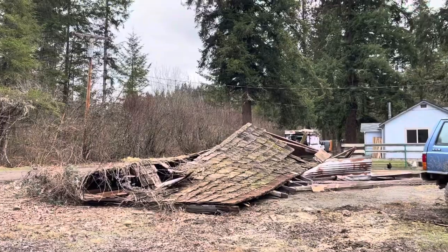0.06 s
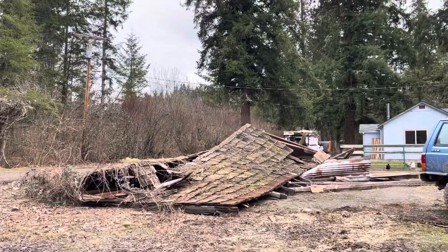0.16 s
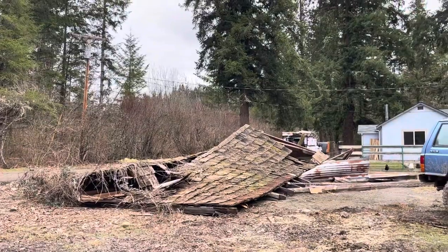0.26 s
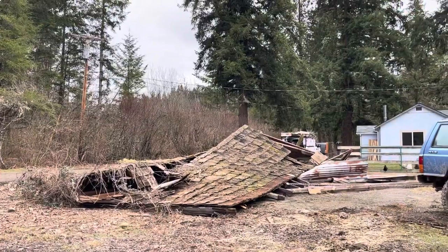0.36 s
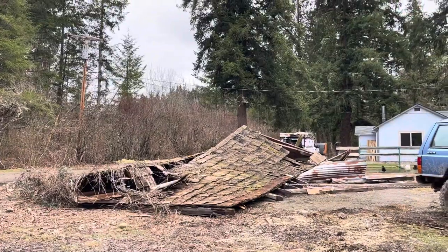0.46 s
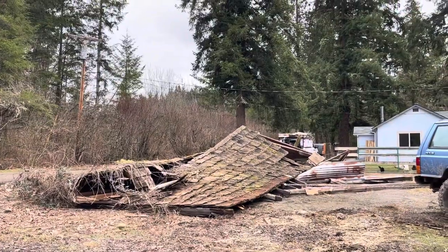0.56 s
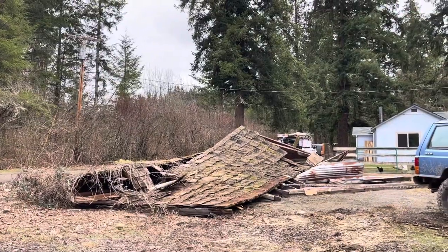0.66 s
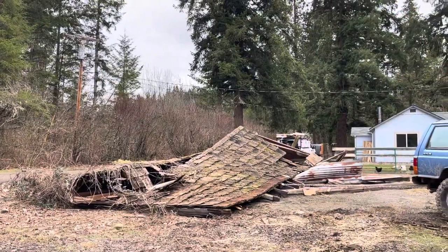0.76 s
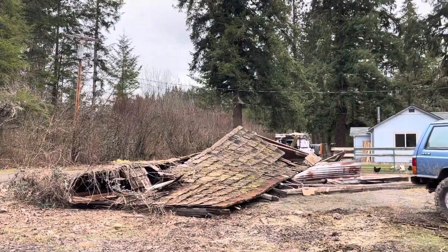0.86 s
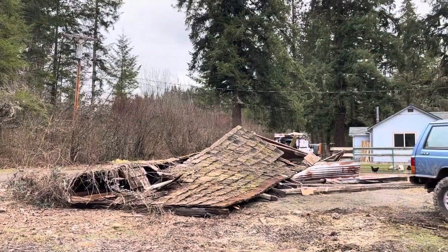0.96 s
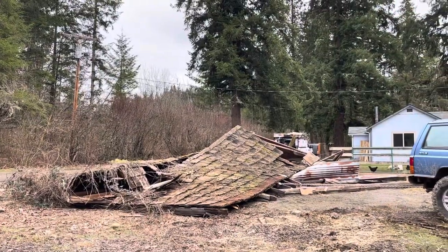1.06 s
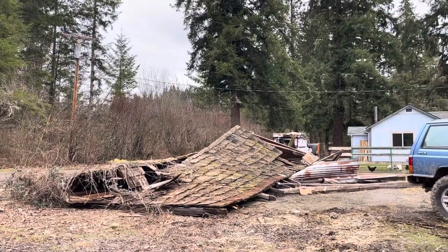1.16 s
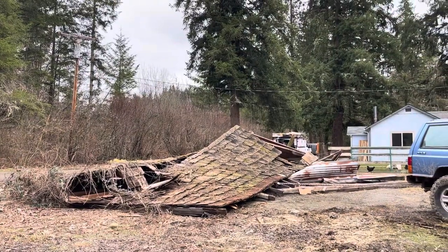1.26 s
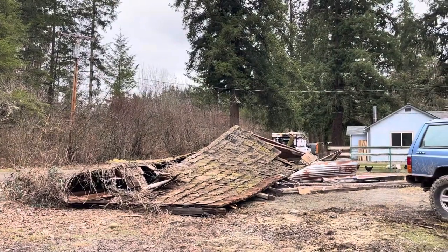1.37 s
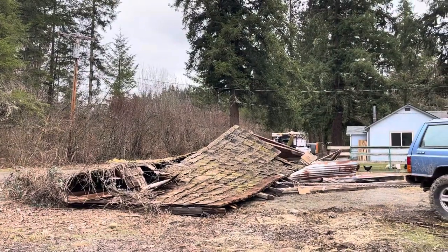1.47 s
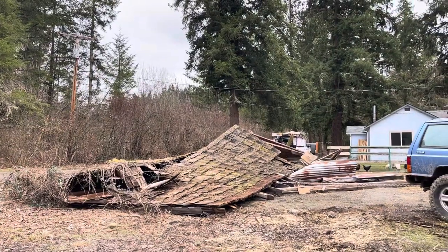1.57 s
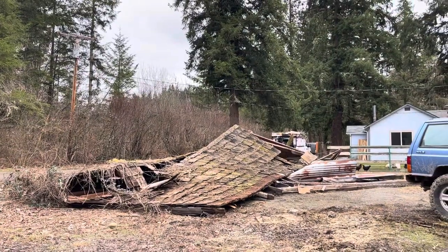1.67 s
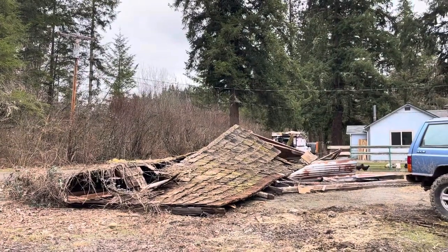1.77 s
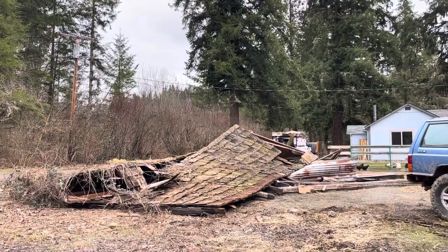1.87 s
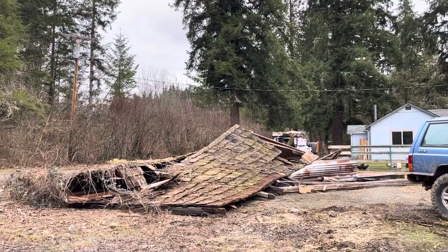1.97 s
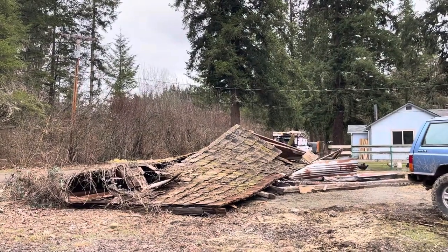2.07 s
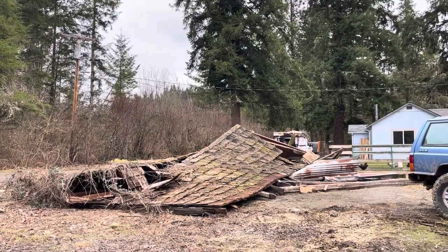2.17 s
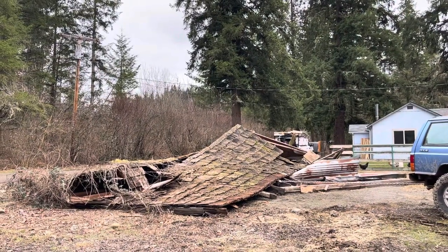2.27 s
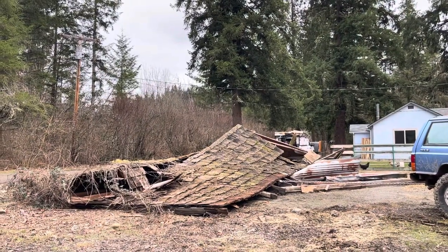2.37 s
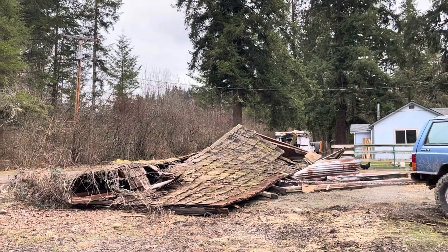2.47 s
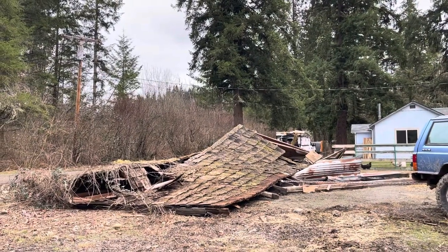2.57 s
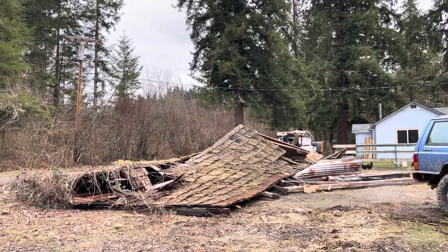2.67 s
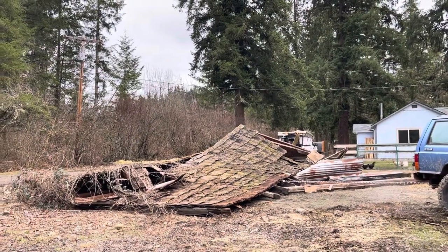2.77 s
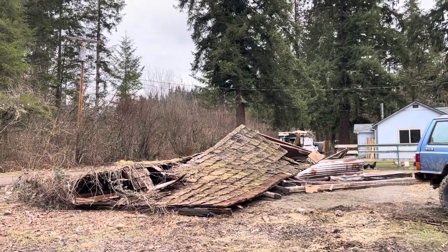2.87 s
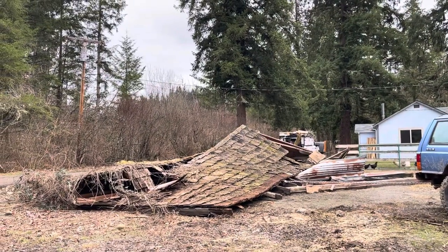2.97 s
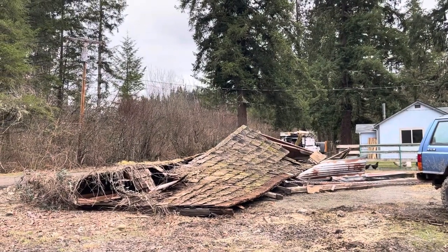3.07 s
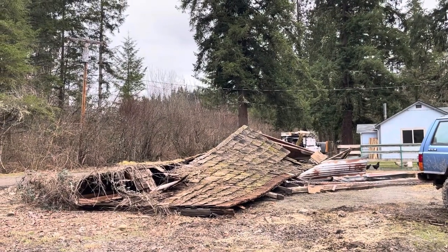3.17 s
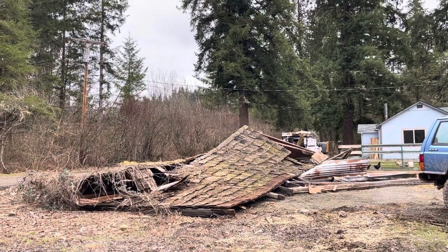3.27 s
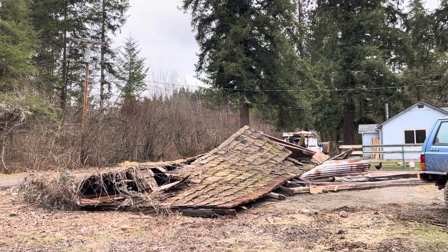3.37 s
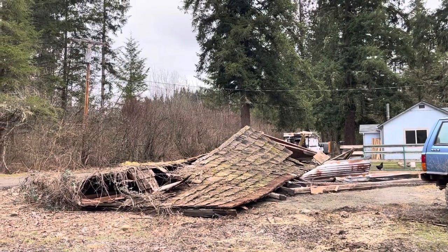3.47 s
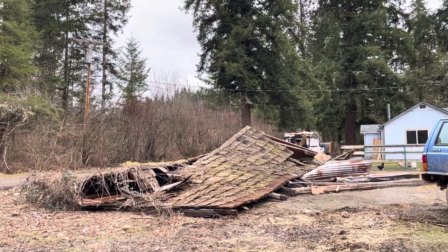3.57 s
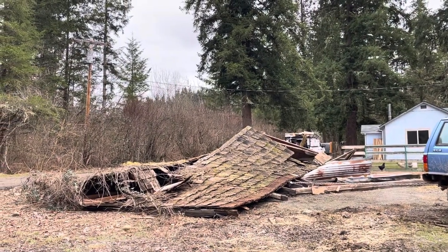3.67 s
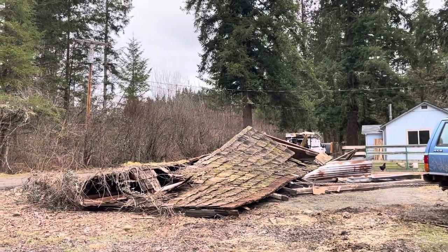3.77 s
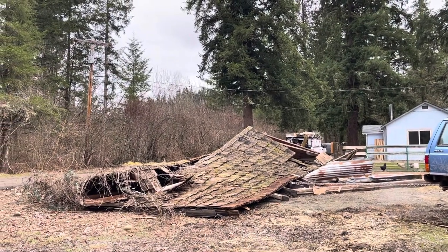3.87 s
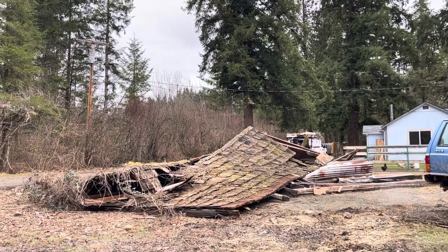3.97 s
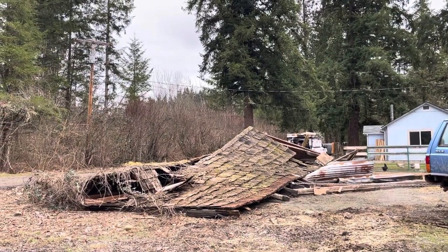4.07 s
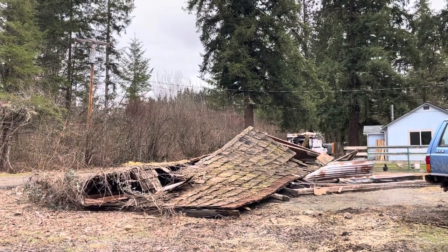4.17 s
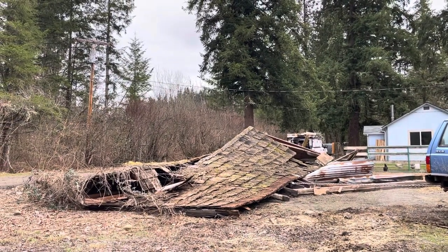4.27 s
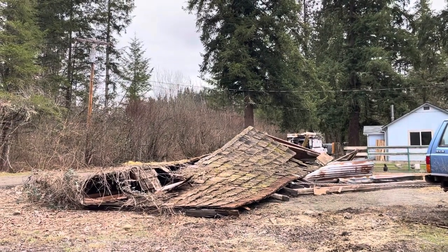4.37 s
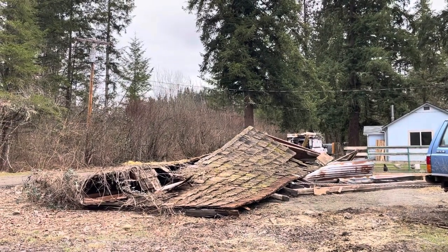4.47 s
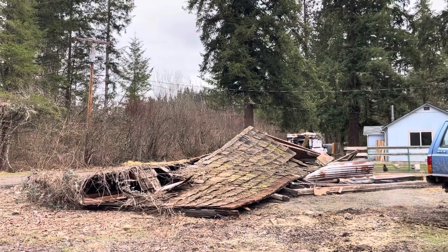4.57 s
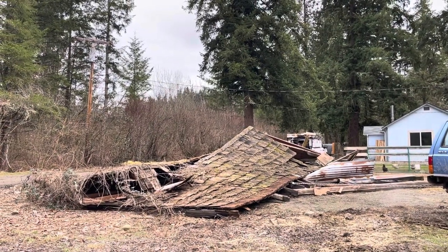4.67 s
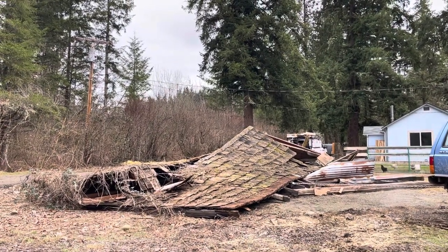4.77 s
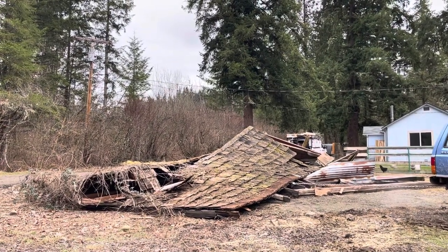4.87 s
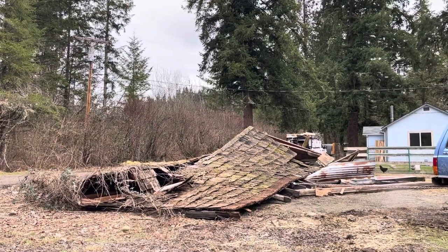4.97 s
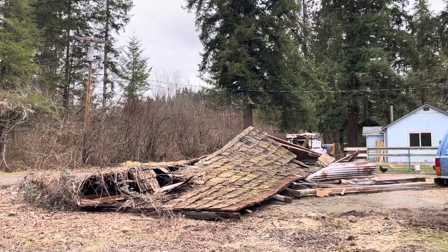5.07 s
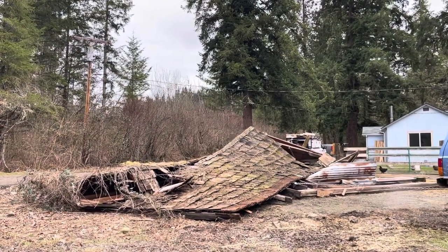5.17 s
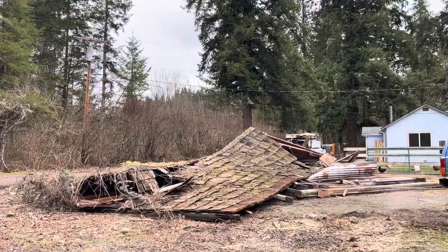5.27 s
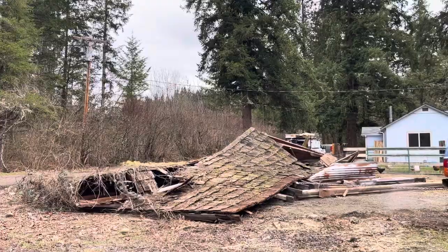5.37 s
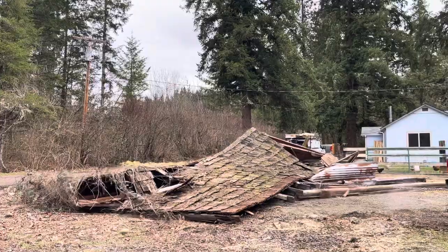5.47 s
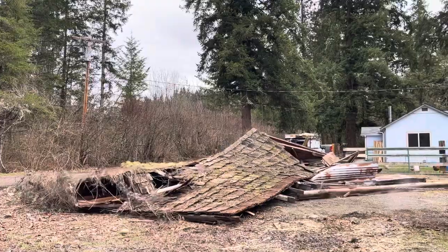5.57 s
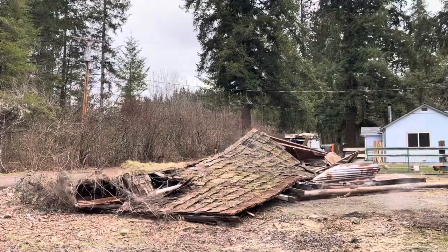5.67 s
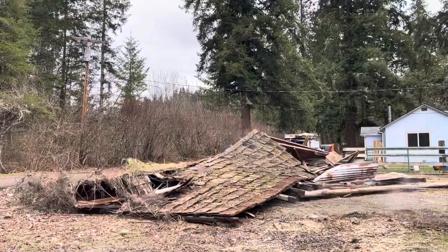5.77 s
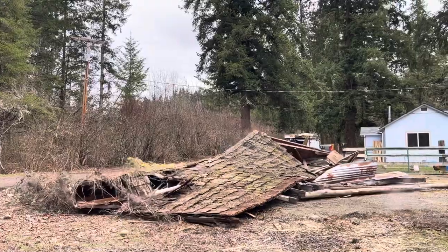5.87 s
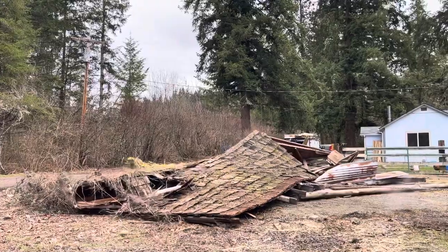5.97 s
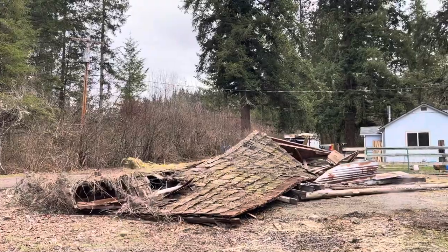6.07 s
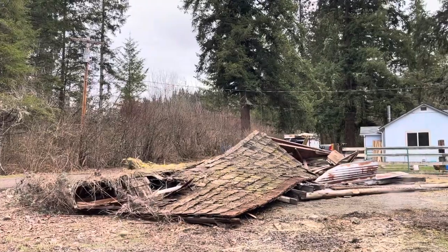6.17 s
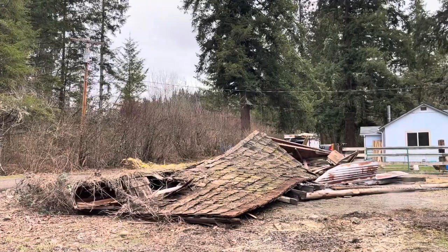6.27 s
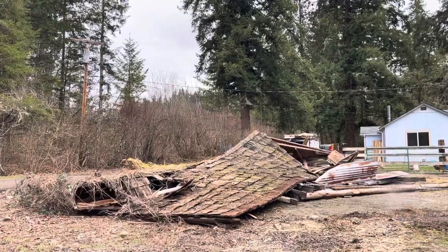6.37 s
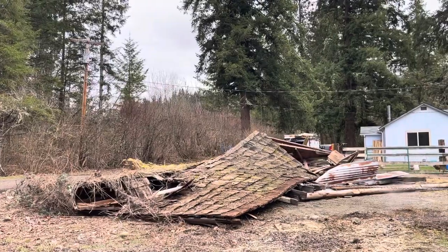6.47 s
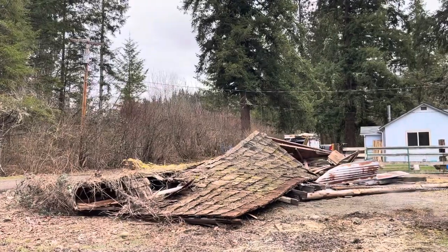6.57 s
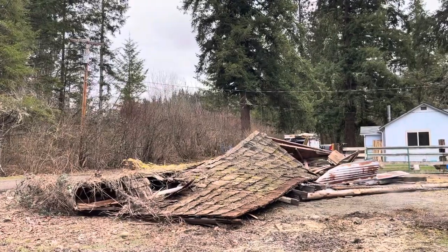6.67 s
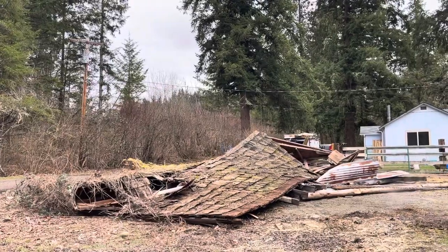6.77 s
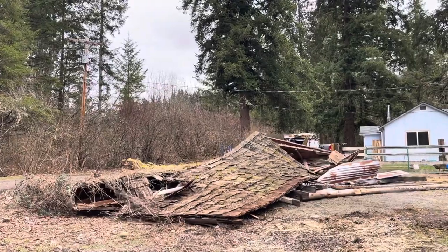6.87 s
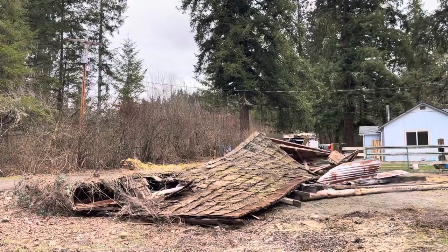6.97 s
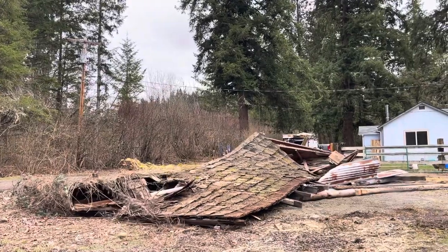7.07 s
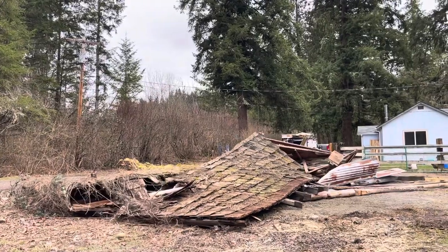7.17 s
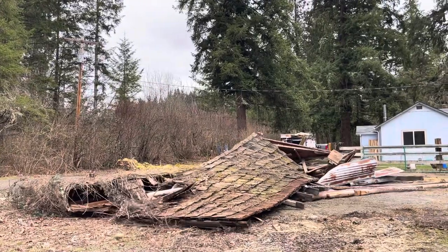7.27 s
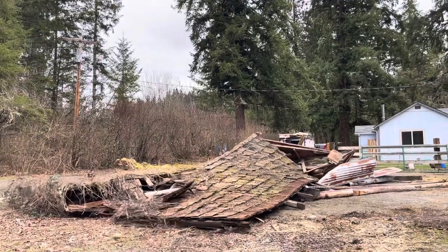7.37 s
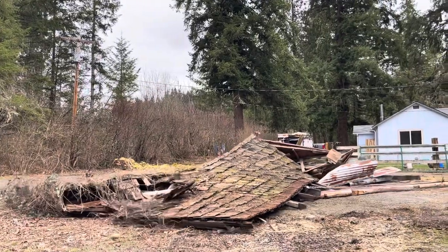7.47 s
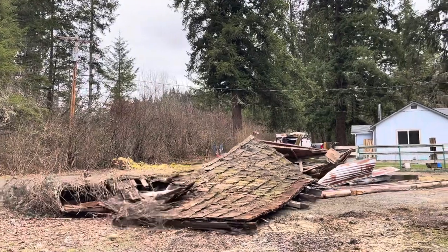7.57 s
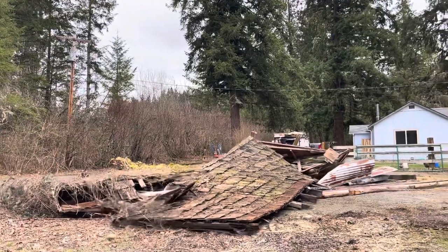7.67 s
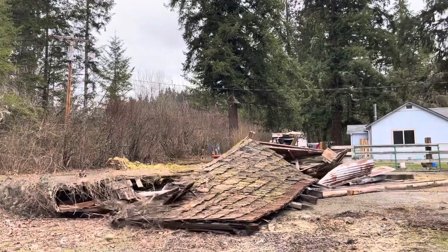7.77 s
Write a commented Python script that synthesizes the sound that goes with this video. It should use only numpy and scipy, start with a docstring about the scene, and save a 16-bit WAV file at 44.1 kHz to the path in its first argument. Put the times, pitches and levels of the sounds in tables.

```python
"""An open farm lot: a truck to the right of two microphones hauls on a line tied to a fallen barn.
Its eight-cylinder engine labours, revs, drops towards idle and pulls again: orders of the firing rate
through an exhaust pipe, with rumble, hiss and valve clatter. Boards snap, rip and knock as bursts of fibre
fractures and hollow ringing modes; nails squeak, a beam groans, timbers thump the ground, and the shingled
roof slides and settles, loudest towards 5.6 s and 7.7 s. A tree line returns a dull echo of the wreck."""
import sys
import numpy as np
from scipy import signal
from scipy.fft import rfft, irfft
from scipy.io import wavfile
from scipy.ndimage import uniform_filter1d

SR = 44100
rng = np.random.default_rng(int(sys.argv[2]) if len(sys.argv) > 2 else 0)


def materialize(psi):
    """Save the field psi as 16-bit PCM at rate SR to the path in sys.argv[1].

    A 1-D psi becomes a single channel; in a 2-D psi each row is a channel.
    """
    bounded = np.clip(np.atleast_2d(psi).T, -1, 1)
    quanta = np.round(bounded * 32767).astype(np.int16)
    wavfile.write(sys.argv[1], SR, quanta)


N = 344421
TIME = np.arange(N) / SR


def from_db(db):
    """Decibels to gain."""
    return 10 ** (np.asarray(db) / 20)


def rms_one(x):
    """Scale to unit power."""
    return x / np.sqrt(np.mean(x ** 2) + 1e-20)


def in_time(rows):
    """Each column of a curve at every sample."""
    s, *columns = np.transpose(rows)
    return [np.interp(TIME, s, column) for column in columns]


def at_hz(points, hz):
    """Read a spectrum on a log-frequency axis."""
    f, value = np.transpose(points)
    return np.interp(np.log(hz + 1e-3), np.log(f), value)


def drift(rate):
    """Smooth random course of unit power with `rate` new values a second."""
    knots = rng.standard_normal(N // 20)
    return rms_one(np.interp(TIME * rate, np.arange(len(knots)), knots))


def body(spectrum, modes_db=0, spacing_hz=150, size=2048):
    """Causal impulse response of unit energy; random peaks and dips are one body's own resonances."""
    hz = np.arange(size // 2 + 1) * SR / size
    peaks = np.interp(hz / spacing_hz, np.arange(size), rng.standard_normal(size))
    # folding the cepstrum onto positive time gives minimum phase
    cepstrum = irfft(np.log(from_db(at_hz(spectrum, hz) + modes_db * peaks)))
    cepstrum[1:size // 2] *= 2
    cepstrum[size // 2 + 1:] = 0
    response = irfft(np.exp(rfft(cepstrum)))
    return response / np.linalg.norm(response)


def through(x, response):
    """Filter, keeping the length."""
    return signal.oaconvolve(x, response)[:len(x)]


def add(out, s, sound):
    """Mix a sound in from time s."""
    at = int(s * SR)
    out[at:at + len(sound)] += sound[:N - at]


# engine speed before the flywheel smooths it: (time [s], firing rate [firings per s])
ENGINE_SPEED = [(0.0, 60.0), (0.35, 60.6), (0.76, 88.9), (1.22, 89.7), (1.56, 105.8), (2.01, 102.6),
                (4.18, 104.6), (4.82, 110.6), (4.99, 124.0), (5.22, 130.0), (5.39, 125.0), (5.8, 69.7),
                (6.31, 67.2), (6.78, 110.0), (6.92, 115.3), (7.28, 107.8), (7.48, 96.4), (7.81, 91.9)]
# hauls on the taut line: (time [s], length [s])
LINE_HAULS = [(4.574, 0.43), (6.72, 0.51)]
FLYWHEEL_S, TAKE_UP_S = .1, 0.19
CRUISE_HZ = 104  # firings per second
CRUISE_DB, DB_PER_OCTAVE, DB_PER_OCTAVE_PER_S, STRAIN_DB = -22.5, 4.5, 0.4, 3


def running():
    """Flywheel-smoothed firing rate; exhaust level in dB grows with speed, acceleration and a taut line."""
    rate = uniform_filter1d(in_time(ENGINE_SPEED)[0], int(FLYWHEEL_S * SR), mode="nearest")
    octaves = np.log2(rate / CRUISE_HZ)
    octaves_per_s = np.gradient(octaves) * SR
    taut = 0
    for s, length in LINE_HAULS:
        corners = [s, s + TAKE_UP_S, s + length, s + length + TAKE_UP_S]
        taut = taut + np.interp(TIME, corners, [0, 1, 1, 0])
    load_db = CRUISE_DB + DB_PER_OCTAVE * octaves + DB_PER_OCTAVE_PER_S * octaves_per_s + STRAIN_DB * taut
    return rate, load_db


# uneven firing of the two banks: (multiple of the firing rate [ratio], level before pipe and load [dB])
FIRING_ORDERS = [(0.499, 5), (1, -0.27), (1.25, -15.5), (1.5, -5.5), (1.75, -11.5), (2, -9), (3, -4),
                 (3.998, -7.5), (6, -8.5)]
# response of the exhaust pipe: (frequency [Hz], gain [dB])
EXHAUST_PIPE = [(28, -47), (44, -15), (78, -7.5), (90, -2.7), (104, -1.95), (130, -10.5), (155, -9),
                (182, -12.5), (205, -10), (235, -20.5), (305, -23), (430, -40.5), (640, -21.6)]
EDGE_DB_PER_OCTAVE = 11  # softer pulses below cruise speed: orders from the third up weaken


def engine_tone(rough=0.048, lope=0.24):
    """Orders of the firing rate, sounded through the exhaust pipe."""
    rate, load_db = running()
    phase = 2 * np.pi * np.cumsum(rate) / SR
    octaves_below_cruise = np.minimum(np.log2(rate / CRUISE_HZ), 0)
    tone = 0
    for multiple, db in FIRING_ORDERS:
        # the bank and firing beats are firm; the other orders waver more
        unsteady = rough if multiple < 1.1 and db > -6 else lope
        angle = multiple * phase + rng.uniform(0, 2 * np.pi)
        wave = (1 + unsteady * drift(24)) * np.sin(angle) + unsteady * drift(24) * np.cos(angle)
        edge_db = EDGE_DB_PER_OCTAVE * octaves_below_cruise * (round(multiple) > 2)
        pipe_db = at_hz(EXHAUST_PIPE, multiple * rate)
        tone = tone + np.sqrt(2) * wave * from_db(db + edge_db + pipe_db)
    return from_db(load_db) * tone


# fan and valve gear: (frequency [Hz], relative density [dB per Hz])
FAN_AND_VALVES = [(150, -14.5), (300, 9), (430, 2.5), (700, 5), (920, -0.4), (1400, -4), (2200, -8.5),
                  (2800, -7.5), (3700, -14), (4600, -17), (6000, -15.5), (9000, -14.5), (11400, -19),
                  (12400, -81)]


def engine_noise(rumble_db=-14.5, hiss_db=-40.5, hiss_slope_db=8.0, chuff=0.091, clatter=0.072, size=128):
    """Combustion rumble and hiss flutter once a revolution; valve clatter repeats every eight firings."""
    rate, load_db = running()
    cycles = np.cumsum(rate) / SR / 8
    puffs = 1 + chuff * np.cos(2 * np.pi * 2 * cycles)  # two revolutions a cycle
    valves = clatter * np.interp(cycles % 1, np.linspace(0, 1, size), rng.standard_normal(size))
    band = signal.butter(2, [116, 415], "band", fs=SR, output="sos")
    combustion = through(rng.standard_normal(N) * puffs, body(EXHAUST_PIPE, size=8192))
    rumble = rms_one(signal.sosfilt(band, combustion))
    hiss = rms_one(through((rng.standard_normal(N) + valves) * puffs, body(FAN_AND_VALVES)))
    octaves = np.log2(rate / np.median(rate))
    # hiss follows only half of the change in load
    hiss_level_db = hiss_db + hiss_slope_db * octaves + .5 * (load_db - np.median(load_db))
    return from_db(load_db + rumble_db) * rumble + from_db(hiss_level_db) * hiss


# colour the microphones give the truck's side: (frequency [Hz], left minus right [dB])
TRUCK_SIDE_COLOUR = [(350, 0), (660, -7.5), (1900, 6.5), (2800, -2), (3700, -3.3), (5000, 7.2), (5900, 3.5),
                     (7500, 0.6)]
TRUCK_LAG_S = .000285


def truck():
    """It stands to the right, so its sound reaches the left microphone late."""
    hz = np.arange(N // 2 + 1) * SR / N
    sound = rfft(engine_tone() + engine_noise())
    # the lag in phase stops growing at two cycles, near 7 kHz
    late = np.exp(-2j * np.pi * np.minimum(hz * TRUCK_LAG_S, 2))
    shade = from_db(at_hz(TRUCK_SIDE_COLOUR, hz) / 2)
    return irfft(np.array([sound * late * shade, sound / shade]), N)


def fractures(size, per_s, spread_db):
    """Random clicks, mostly small and a few large."""
    sizes = from_db(spread_db * np.minimum(rng.exponential(1, size), 4))
    return sizes * rng.choice([-1, 1], size) * (rng.random(size) < per_s / SR)


def board(register, modes_db):
    """One piece of wood: its resonances lie further apart the higher the register."""
    centre_hz = np.median(np.array(register)[:, 0])
    return body(register, modes_db, spacing_hz=60 + centre_hz / 20)


# slides of the wreck: (time of the height [s], swell [s], settling [s],
# boards' level [dB], shingles' level [dB])
WRECK_SLIDES = [(1.79, 0.15, 0.19, -33, -44), (4.66, .06, 0.35, -39, -57), (5.62, 0.76, 0.84, -29, -34.5),
                (6.101, 0.27, 0.3, -39.5, -42.5), (7.15, 0.71, 0.22, -37, -37.5),
                (7.7, 0.93, 0.66, -29, -32.5)]
SLIDE_CURVE = 1.8  # exponent of swell and settling
SHED_DB, SHED_S = -11, 0.08  # debris shed by every break
TYPICAL_BREAK_S = .01


def sliding(shed_shingles_db=-6):
    """Board and shingle levels in dB: each slide swells and settles, each break sheds its share."""
    boards, shingles = np.full((2, N), 1e-12)  # powers
    for s, swell, settling, boards_db, shingles_db in WRECK_SLIDES:
        motion = np.interp(TIME, [s - swell, s, s + settling], [0, 1, 0]) ** SLIDE_CURVE
        boards = boards + (from_db(boards_db) * motion) ** 2
        shingles = shingles + (from_db(shingles_db) * motion) ** 2
    shed, fade = np.zeros(N), np.exp(-2 * TIME[:SR] / SHED_S)
    for s, length, db, _ in BOARD_BREAKS:
        share = length / (length + TYPICAL_BREAK_S)
        add(shed, s, from_db(db + SHED_DB) ** 2 * share * fade)
    shingles = shingles + from_db(shed_shingles_db) ** 2 * shed
    return 10 * np.log10(boards + shed), 10 * np.log10(shingles)


def tumbling(register, level_db, count, per_s, spread_db, uneven_db, modes_db, size=4096):
    """About `count` pieces a second shift, each in a fading spurt of knocks in one of a stock of woods."""
    out, turn = np.zeros(N + size), SR // count
    woods = [rfft(board(register, modes_db), size) for _ in range(count // 2)]
    fade = np.exp(-np.linspace(0, 2, size // 2))
    for slot in range(0, N - turn, turn):
        at = slot + rng.integers(turn)
        knocks = fractures(size // 2, per_s, spread_db) * fade
        knocks[0] += 1
        piece = irfft(rfft(knocks, size) * woods[rng.integers(len(woods))])
        out[at:at + size] += from_db(uneven_db * rng.standard_normal()) * rms_one(piece)
    return from_db(level_db) * rms_one(out[:N])


# the three registers of breaking wood, low to high: (frequency [Hz], relative density [dB per Hz])
THUD_WOOD = [(35, -34.5), (70, -6.5), (180, 3), (330, -5.5), (740, -7.5), (1000, -40)]
CRACK_WOOD = [(350, -40.5), (650, -36), (850, -5), (1300, -10), (2100, -10.5), (3000, -13.5), (4000, -23),
              (8000, -108)]
SPLINTER_WOOD = [(1500, -7), (2700, -32.5), (3400, -7.5), (5600, -6), (7200, -11.5), (8600, -7),
                 (10400, -4), (11900, -19), (13000, -79.5)]
TIMBER_DB = 7  # thuds above the clatter of boards


def wreck():
    """Heavy timbers thud, boards clatter, shingles crackle."""
    boards_db, shingles_db = sliding()
    timbers = tumbling(THUD_WOOD, boards_db + TIMBER_DB, count=150, per_s=600,
                       spread_db=2.5, uneven_db=1, modes_db=3.5)
    boards = tumbling(CRACK_WOOD, boards_db, count=100, per_s=900,
                      spread_db=3.6, uneven_db=2, modes_db=6)
    shingles = tumbling(SPLINTER_WOOD, shingles_db, count=70, per_s=2400,
                        spread_db=3.5, uneven_db=1.6, modes_db=2.5)
    return timbers + boards + shingles


BOARD_MODES_DB = 6  # height of a board's resonances, before a long break evens them out


def wood_blow(length, levels, first_break, swell, tail_db=-11, tail_s=0.029, size=8192):
    """A quick run of fibre fractures, then crumbs, sounded in each (register, dB)."""
    t = np.arange(size) / SR
    envelope = (t / length) ** swell * np.exp(-(t / length) ** 1.5)
    burst = envelope * fractures(size, per_s=12000, spread_db=3)
    burst[SR // 1000] += first_break  # 1 ms in
    crumb_fade = np.exp(-t / min(tail_s, 3 * length))
    crumbs = from_db(tail_db) * crumb_fade * fractures(size, per_s=4500, spread_db=6)
    # a quick snap rings with one board's resonances; in a long break and the crumbs, many pieces even out
    modes_db = BOARD_MODES_DB / (1 + length / (2 * TYPICAL_BREAK_S))
    out = 0
    for register, db in levels:
        part = through(burst, board(register, modes_db)) + through(crumbs, body(register))
        out = out + from_db(db) * part / np.sqrt(np.sum(part ** 2) / (length * SR))
    return out


# boards that snap: (time [s], length of the break [s], crack level before the gain of snaps() [dB],
# depth: hollow body against the crack [dB]; 0 breaks right through, -20 splits along the grain)
BOARD_BREAKS = [(1.664, 0.013, -34, 6), (1.938, 0.0013, -27, 2.5), (4.621, 0.064, -36.5, -3),
                (4.888, 0.0024, -28, 2), (5.018, 0.013, -22, -8.5), (5.025, 0.0068, -43, -6),
                (5.152, 0.0063, -27, -3.5), (5.223, 0.031, -20, -3), (5.364, 0.0082, -18, 6.5),
                (5.441, 0.014, -23.5, -2.5), (5.477, 0.0062, -25.5, 5), (5.526, 0.021, -28, -14),
                (5.553, 0.0078, -25, -5.5), (5.597, 0.017, -27.5, -11), (5.621, 0.016, -24, -6),
                (5.689, 0.022, -25.5, 4.5), (5.757, .005, -31, -10), (5.841, 0.005, -36, -4),
                (5.898, 0.023, -25.5, -1), (6.105, 0.016, -34, -1.5), (6.144, 0.021, -36.5, -1.5),
                (6.297, 0.037, -44, -2), (6.842, 0.026, -26.5, -21.5), (6.855, 0.029, -25.5, 0),
                (7.125, 0.0042, -25.5, -10.5), (7.18, 0.0067, -18, -14), (7.233, 0.0095, -20.5, -14),
                (7.27, 0.0034, -26, -12.5), (7.29, 0.015, -26, -8.5), (7.336, 0.0055, -16, -12.5),
                (7.351, 0.01, -25, -8.5), (7.712, 0.0089, -37, -13)]
# bright splintery bursts, alone or on top of a board's break:
# (time [s], length [s], level before that gain [dB])
BRIGHT_BURSTS = [(4.338, 0.0057, -43), (5.507, 0.0023, -26.5), (5.689, 0.0091, -18.5), (5.878, 0.0038, -24),
                 (5.895, 0.012, -23.5), (6.048, 0.0035, -32), (6.102, 0.0056, -32), (7.026, 0.0034, -31.5),
                 (7.428, 0.0045, -30), (7.708, 0.14, -37)]
# the hollow body of a single board: (frequency [Hz], relative density [dB per Hz])
HOLLOW_BODY = [(60, -18), (150, -1.5), (470, 0), (740, -3), (1050, -10.5), (2200, -34)]
# the bright sound of thin dry wood: (frequency [Hz], relative density [dB per Hz])
THIN_WOOD = [(1200, -43), (3400, -3), (5600, -11), (7200, -12), (8700, -2), (11600, -8.5), (13000, -23)]
# more splinters fly from a deep break and from a quick one
SPLINTER_DB, SPLINTER_PER_DEPTH, SPLINTER_DB_PER_DOUBLING = -1.5, 0.4, -2
# fibres tear just before the break, for longer where it splits along the grain
TEAR_S, TEAR_S_PER_DEPTH, TEAR_DB = .0035, .0005, -11
THUD_S, THUD_DB = 0.015, -12.5  # soft thud of a hollow knock, against the knock's level


def snaps(gain_db=2, first_break=8):
    """A board tears, then gives way sharply; thin wood bursts brightly; each hollow knock has a soft thud."""
    out = np.zeros(N)
    for s, length, db, depth in BOARD_BREAKS:
        doublings = np.log2(length / TYPICAL_BREAK_S)
        splinter_db = db + SPLINTER_DB + SPLINTER_PER_DEPTH * depth + SPLINTER_DB_PER_DOUBLING * doublings
        tear_s = TEAR_S + TEAR_S_PER_DEPTH * max(-depth, 0)
        tear = [(CRACK_WOOD, db + TEAR_DB), (SPLINTER_WOOD, splinter_db + TEAR_DB)]
        give = [(HOLLOW_BODY, db + depth), (CRACK_WOOD, db), (SPLINTER_WOOD, splinter_db)]
        add(out, s - tear_s, wood_blow(tear_s, tear, first_break=False, swell=True))
        add(out, s, wood_blow(length, give, first_break, swell=False))
    for s, length, db in BRIGHT_BURSTS:
        add(out, s, wood_blow(length, [(THIN_WOOD, db)], first_break, swell=False))
    for s, _, db in WOOD_KNOCKS:
        thud = [(HOLLOW_BODY, db + THUD_DB)]
        add(out, s, wood_blow(THUD_S, thud, first_break=False, swell=True))
    return from_db(gain_db) * out


# boards that rip along the grain: (time [s], length [s], starting pitch [Hz], level of the first spurt [dB])
GRAIN_RIPS = [(1.774, 0.042, 3830, -29), (4.62, 0.069, 2840, -33.5), (5.757, 0.014, 2340, -25.5),
              (6.828, 0.058, 2700, -37), (7.144, 0.033, 1350, -21), (7.531, .04, 3200, -28.5),
              (7.722, 0.066, 3170, -30)]


def rips(sink_octaves=1.07, sharpness=3.2, fade_db=-4, count=6, size=2048):
    """Fibres part in dense spurts; the loose splinter grows longer, so its broad resonance sinks."""
    out, t = np.zeros(N), np.arange(size) / SR
    for s, length, hz, db in GRAIN_RIPS:
        spurt_s = length / count
        swell = t / spurt_s * np.exp(1 - t / spurt_s) / np.sqrt(2)
        for k in range(count):
            centre_hz = hz * 2 ** (-sink_octaves * k / count)
            resonance = signal.iirpeak(centre_hz, sharpness, fs=SR)
            fibres = signal.lfilter(*resonance, fractures(size, per_s=9000, spread_db=3))
            add(out, s + k * spurt_s, from_db(db + fade_db * k / count) * rms_one(fibres) * swell)
    return out


# hollow wooden knocks, from landing planks or ringing in a breaking board:
# (time [s], lowest mode [Hz], level [dB])
WOOD_KNOCKS = [(1.792, 573, -23.5), (4.339, 1700, -25), (4.626, 430, -31), (4.645, 374, -21.5),
               (5.224, 522, -14), (5.365, 427, -9.5), (5.444, 435, -16.5), (5.646, 500, -10),
               (5.696, 2010, -8), (5.72, 416, -16.5), (5.757, 328, -16.5), (5.778, 225, -18),
               (5.874, 215, -20), (6.362, 403, -23), (7.182, 1450, -15.5), (7.336, 1260, -16),
               (7.41, 313, -20), (7.475, 880, -17.5), (7.578, 730, -14.5), (7.781, 970, -20.5)]
# bending and twisting modes of a plank, before their random spread: (multiple of the lowest [ratio],
# level against the knock's [dB])
RING_MODES = [(0.999, 1.5), (1.15, -4), (1.58, -11.5)]
RING_T60_CYCLES, RING_RISE_CYCLES = 35, 0.26  # cycles of the lowest mode


def knock_rings(size=8192):
    """Each hollow knock rings on the modes of its wood; the lower the note, the longer it lasts."""
    out, t = np.zeros(N), np.arange(size) / SR
    for s, hz, db in WOOD_KNOCKS:
        cycles = hz * t
        rise = 1 - np.exp(-cycles / RING_RISE_CYCLES)
        decay = from_db(-60 * cycles / RING_T60_CYCLES)
        modes = 0
        for multiple, mode_db in RING_MODES:
            ratio = multiple ** rng.uniform(.85, 1.15)
            modes = modes + from_db(mode_db) * np.sin(2 * np.pi * (ratio * cycles + rng.random()))
        add(out, s, from_db(db) * rise * decay * modes)
    return out


# nails that squeak as they tear out: (time [s], pitch [Hz], fade to 1/e [s], starting level [dB])
NAIL_SQUEAKS = [(1.938, 3960, 0.0095, -30.5), (4.623, 4570, 0.023, -29.5), (6.84, 1770, 0.015, -16.5)]


def nails(width_hz=400, size=4096):
    """A nail chatters out of its hole in one narrow resonance."""
    out, t = np.zeros(N), np.arange(size) / SR
    for s, hz, fade_s, db in NAIL_SQUEAKS:
        resonance = signal.iirpeak(hz, hz / width_hz, fs=SR)
        squeak = signal.lfilter(*resonance, rng.standard_normal(size))
        add(out, s, from_db(db) * rms_one(squeak) * np.exp(-t / fade_s))
    return out


# a heavy timber reaches the ground: (time [s], level of each swing before damping and bass cut [dB])
GROUND_THUMPS = [(5.028, -16.5), (5.643, -20)]


def thumps(ground_hz=75, ring_s=0.032, lowest_hz=45):
    """Soft earth answers each fall with a few low, quickly damped swings."""
    out = np.zeros(N)
    for s, db in GROUND_THUMPS:
        t = np.maximum(TIME - s, 0)
        ratios = rng.uniform(.85, 1.15, 3) * [.7, 1.2, 2]
        swings = sum(np.sin(2 * np.pi * ground_hz * ratio * t) for ratio in ratios)
        out += from_db(db) * swings * np.exp(-t / ring_s)
    return signal.sosfilt(signal.butter(2, lowest_hz, "high", fs=SR, output="sos"), out)


# a beam groans as it bends: (time [s], length [s], first pitch [Hz], last pitch [Hz],
# RMS level of its fundamental at the height [dB])
BEAM_GROANS = [(5.5, 0.251, 150, 180, -28.5)]


def groans():
    """Wood slips against wood in a quickening series: a low tone that swells, rises and fades."""
    out = np.zeros(N)
    for s, length, first_hz, last_hz, db in BEAM_GROANS:
        progress = np.clip((TIME - s) / length, 0, 1)
        angle = 2 * np.pi * np.cumsum(first_hz + (last_hz - first_hz) * progress) / SR
        tone = np.sin(angle) + .5 * np.sin(2 * angle)
        out += from_db(db) * np.sin(np.pi * progress) * tone * np.sqrt(2)
    return out


def scatter(t60, delay, size=32768):
    """Diffuse reflections that start after `delay` and die away; unit energy."""
    t = np.arange(size) / SR
    echoes = rng.standard_normal(size) * np.exp(-np.log(1000) * t / t60) * (t >= delay)
    return echoes / np.linalg.norm(echoes)


# spread between the channels: (frequency [Hz], side gain [dB])
SIDE_WIDTH = [(100, -19), (400, -9), (3500, -8.5), (5000, -3), (7100, -3.5), (8500, -15)]


def scene(trees_db=-14, trees_hz=3500, yard_db=-8, engine_spread_db=-4):
    """Trees echo the wreck dully, the yard scatters the engine; spread-out noises differ by channel."""
    timber = snaps() + wreck() + knock_rings() + rips() + groans() + thumps() + nails()
    dull = signal.butter(1, trees_hz, fs=SR, output="sos")
    echo = signal.sosfilt(dull, through(timber, scatter(t60=1.0, delay=0.017)))
    mid = timber + from_db(trees_db) * echo + from_db(yard_db) * engine_noise()
    # fresh random draws of the same noises make the side
    spread = from_db(engine_spread_db) * engine_noise() + snaps() + rips() + wreck()
    width = from_db(at_hz(SIDE_WIDTH, np.arange(N // 2 + 1) * SR / N))
    side = irfft(rfft(spread) * width, N)
    return truck() + np.array([mid + side, mid - side])


# phase by which the left microphone leads: (frequency [Hz], phase [rad])
LEFT_LEAD = [(6800, 0), (7200, -1.4), (8650, 0), (11850, 2 * np.pi)]
BALANCE_DB, CUTOFF_HZ = 1.4, 12900  # right over left in the deepest bass; top of the band


def record(dry, bass_hz=900):
    """The right microphone hears more bass, the two drift in phase up high, peaks round, the top is cut."""
    hz = np.arange(N // 2 + 1) * SR / N
    lean = from_db(BALANCE_DB / 2 / (1 + (hz / bass_hz) ** 2))
    left = irfft(rfft(dry[0]) / lean, N)
    right = irfft(rfft(dry[1]) * lean * np.exp(-1j * at_hz(LEFT_LEAD, hz)), N)
    pair = np.array([left, right])
    rounded = pair / (1 + (pair / .72) ** 4) ** .25
    return signal.sosfilt(signal.ellip(10, .1, 80, CUTOFF_HZ, fs=SR, output="sos"), rounded)


dry = scene()
out = record(dry)
materialize(out)
```